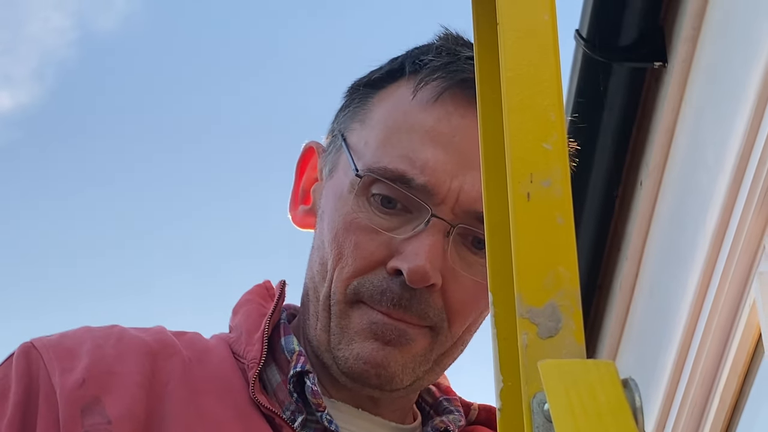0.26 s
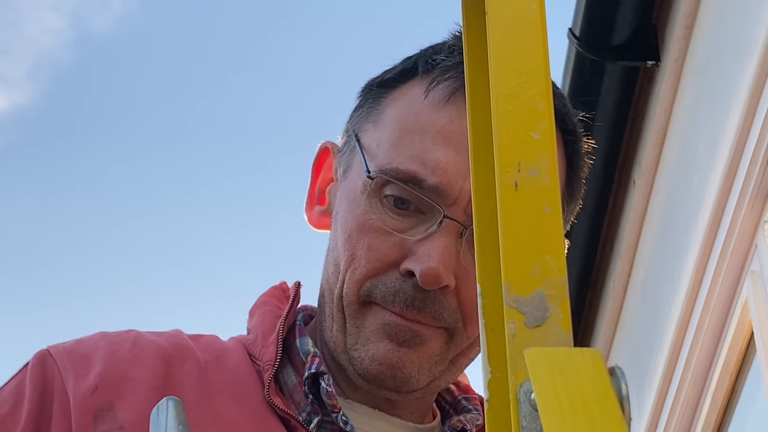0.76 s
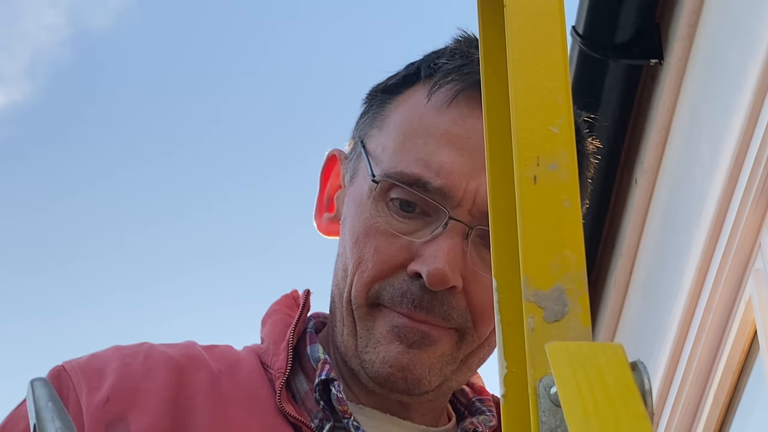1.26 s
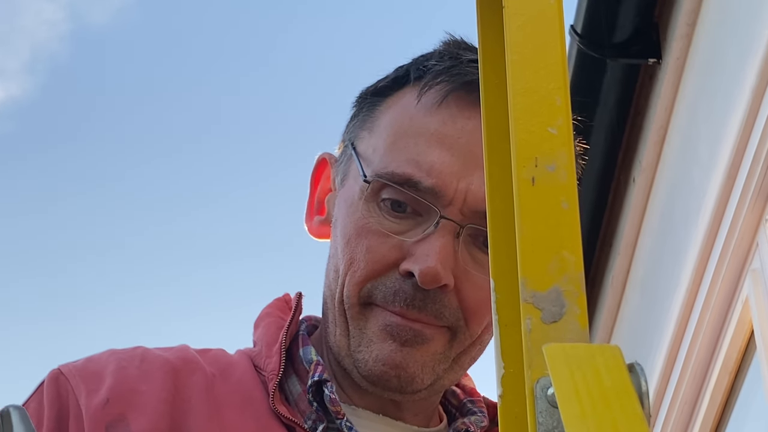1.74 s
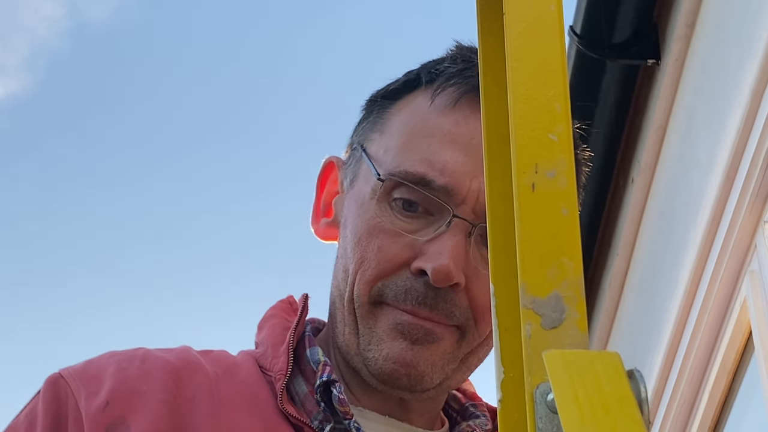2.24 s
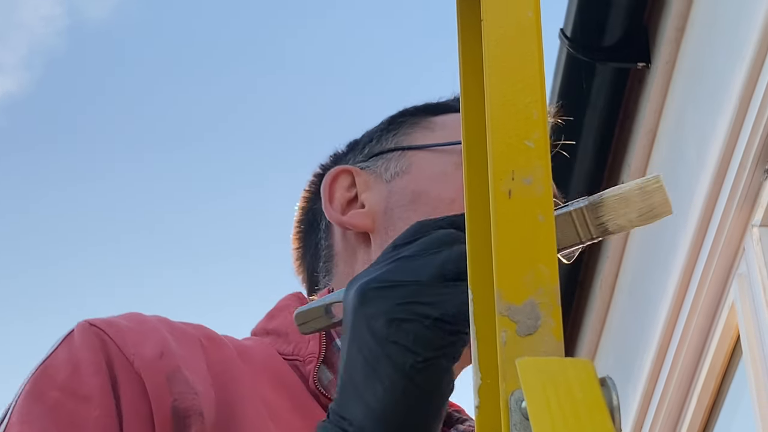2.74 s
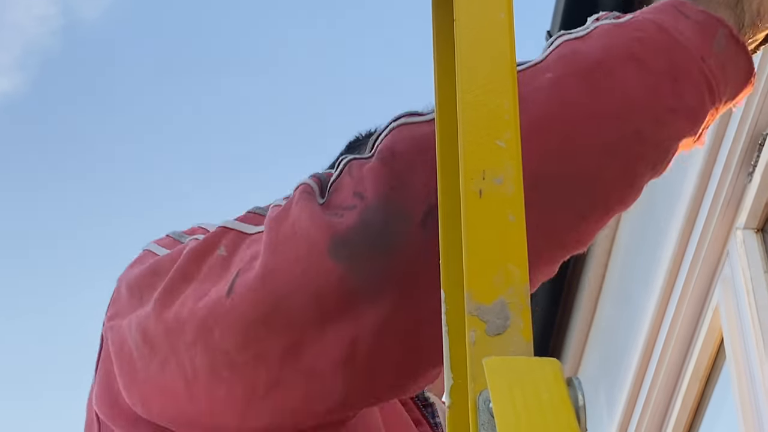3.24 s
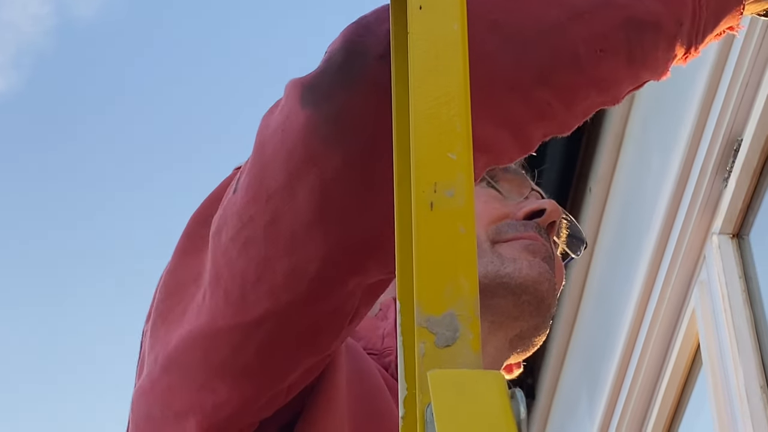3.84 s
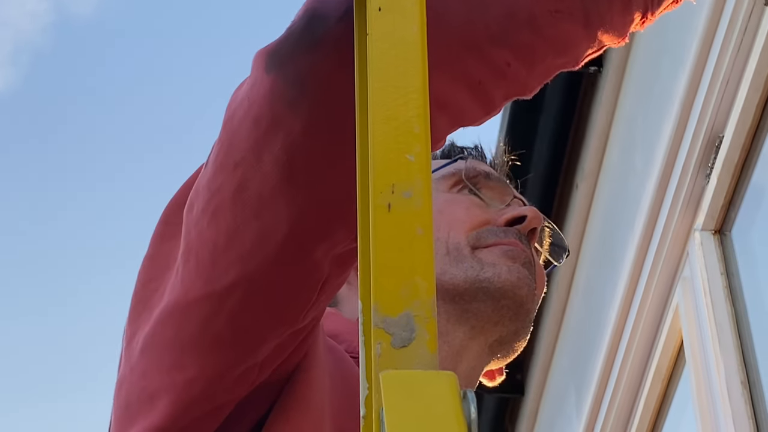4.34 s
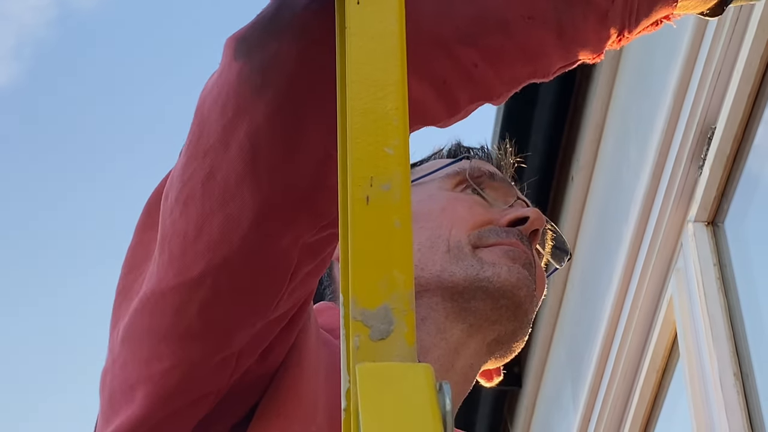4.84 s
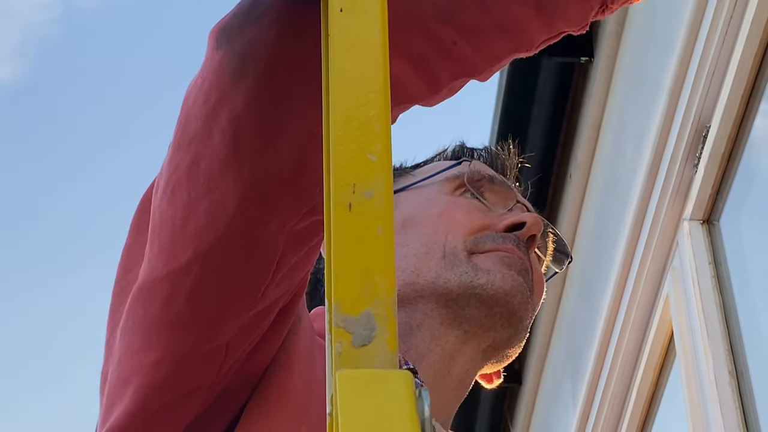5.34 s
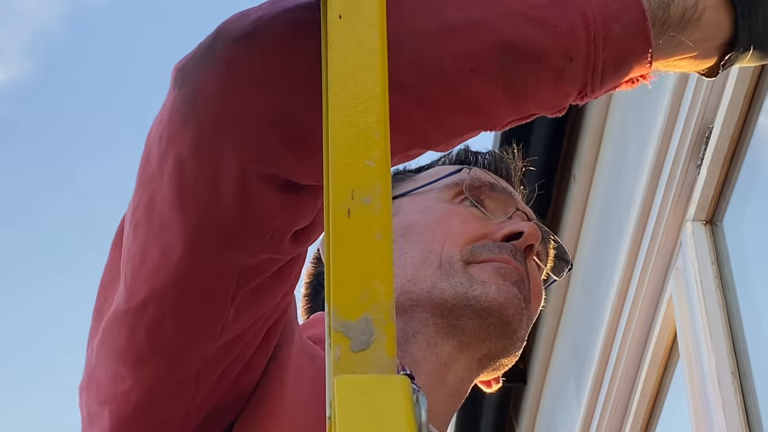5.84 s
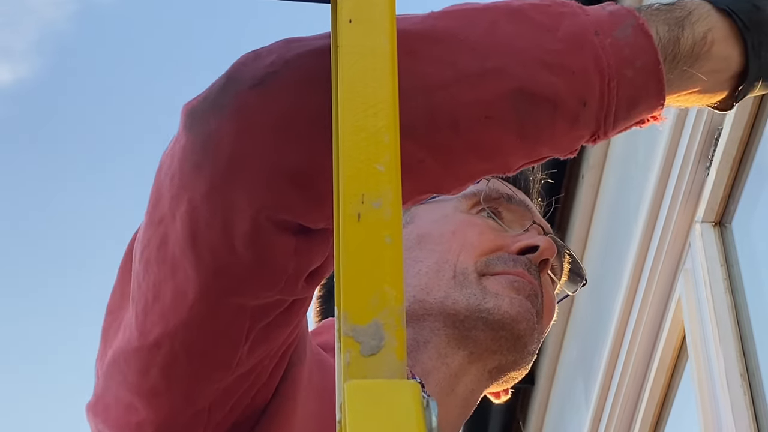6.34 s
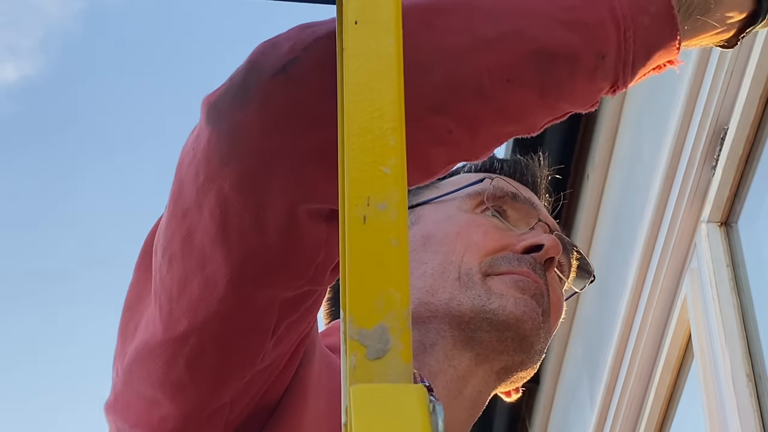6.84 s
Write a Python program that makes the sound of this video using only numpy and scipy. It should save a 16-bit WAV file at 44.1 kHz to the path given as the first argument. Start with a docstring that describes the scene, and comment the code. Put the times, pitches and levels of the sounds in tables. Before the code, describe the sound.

Shore birds chatter some way off above a low outdoor rumble, while a nearer songbird whistles and a paintbrush softly sweeps wood.

```python
"""Painting a window frame, shore birds beyond.

Some way off among echoing roofs a flock of shore birds pipes without pause, each note coloured by
the throat. Nearer by, one songbird whistles and another ticks. Close to the microphone a paint brush
sweeps the frame in tiny slips and bumps it once. Under it all lie town rumble and light wind."""
import sys
import numpy as np
from scipy import signal
from scipy.fft import rfft, irfft, next_fast_len
from scipy.io import wavfile
from scipy.ndimage import map_coordinates

SR = 44100
rng = np.random.default_rng(int(sys.argv[2]) if len(sys.argv) > 2 else 0)


def to_wav(s):
    """Save 16-bit WAV."""
    ch = np.atleast_2d(s).T  # columns
    pcm = np.round(np.clip(ch, -1, 1) * 32767)  # PCM
    wavfile.write(sys.argv[1], SR, pcm.astype(np.int16))


N = 312661

# The distant background. Each row: time in seconds, rumble level in dB, far flock level in dB.
BACKGROUND_LEVELS = [(0, -45.5, -55), (.45, -49.5, -57.5), (1.3, -49, -55.5), (2, -49, -56.5),
                     (3, -46.5, -52), (4, -47.5, -59), (4.8, -53.5, -58), (5.6, -52, -64.5),
                     (6.6, -53, -60), (7.09, -51.5, -61.5)]
# Spectra of town, wind, brush and bird tick. Each row: frequency in Hz, relative density in dB.
RUMBLE_SPECTRUM = [(16, -38), (28, -8.5), (48, 0), (65, -0.5), (122, -6.5), (152, -16), (203, -21),
                   (382, -24), (750, -31), (980, -63.5), (1650, -120)]
WIND_SPECTRUM = [(500, -5.5), (900, 1.5), (1700, -2), (4000, -17.5), (6000, -38), (9000, -33), (15000, -44)]
BRISTLE_SPECTRUM = [(1500, -30), (3500, -11.5), (5500, -5), (7500, -3.5), (9000, -2.5), (11000, -8),
                    (13000, -12.5), (15800, -7)]
TICK_SPECTRUM = [(4300, -40), (5300, -7), (6500, 0.5), (7600, -7.5), (8400, -40)]
# Resonances of a shore bird's throat. Each row: frequency in Hz, gain in dB.
THROAT_GAIN = [(900, 14.5), (1250, 18.5), (1700, 1.5), (2200, 4.5), (2800, 7), (3400, 3), (4000, -10),
               (4600, -12), (5100, -17.5), (8000, -31.5)]
# Piped notes from the near side of the flock. Each row: start and length in seconds,
# first and last pitch in Hz, levels of the first and second partial in dB.
PIPED_NOTES = [(.008, 0.08, 1462, 1364, -63, -60.5), (0.092, 0.058, 1350, 1264, -55.5, -63),
               (.135, 0.14, 1260, 1300, -45.5, -54), (.177, 0.087, 1174, 1090, -43, -54.5),
               (.261, .14, 1300, 1120, -50.5, -52.5), (.268, 0.13, 1524, 1396, -62, -55),
               (.284, 0.058, 1020, 908, -54, -68), (.305, 0.11, 1550, 1416, -55, -52),
               (.33, 0.122, 1441, 1408, -62.5, -57), (.416, 0.057, 1372, 1280, -55, -60),
               (.443, 0.12, 1436, 1342, -53, -59), (.505, 0.046, 1363, 1219, -44.5, -72),
               (.545, 0.021, 1142, 1107, -45.5, -61.5), (.628, 0.043, 1242, 1332, -50, -59.5),
               (.645, 0.099, 1529, 1614, -50.5, -53.5), (.673, .14, 1173, 1067, -48, -64.5),
               (.718, .14, 1330, 1183, -51.5, -55), (.752, .12, 1503, 1393, -47, -50.5),
               (.834, 0.037, 1388, 1277, -42, -51.5), (.865, 0.033, 1185, 1054, -44, -53.5),
               (1.033, 0.058, 1545, 1380, -54, -56), (1.128, 0.073, 1193, 1117, -45, -51),
               (1.203, .17, 1144, 1079, -48.5, -66), (1.277, .12, 1480, 1230, -56, -59.5),
               (1.396, 0.072, 1230, 1113, -48, -52), (1.483, 0.04, 1133, 1070, -55, -63.5),
               (1.516, .12, 1506, 1270, -68, -68), (1.618, 0.031, 1217, 1320, -54, -78),
               (1.666, 0.07, 1226, 1084, -48.5, -54.5), (1.687, 0.026, 1450, 1360, -48, -54),
               (1.732, 0.066, 1485, 1280, -51.5, -51), (1.77, .13, 1546, 1290, -56, -63),
               (1.797, 0.047, 1144, 1076, -48.5, -60.5), (1.8, 0.15, 1580, 1650, -62.5, -72),
               (1.95, 0.071, 1201, 1052, -48.5, -53), (2.074, 0.051, 1573, 1394, -47, -52.5),
               (2.197, 0.035, 1224, 1223, -51.5, -68), (2.219, .054, 1378, 1246, -55, -58),
               (2.249, 0.058, 1175, 1042, -54, -57.5), (2.31, 0.168, 1100, 1107, -76, -70.5),
               (2.358, 0.055, 1557, 1282, -53, -56.5), (2.419, 0.042, 1185, 1030, -48, -63),
               (2.464, 0.019, 1167, 1106, -53, -62), (2.545, 0.079, 1170, 1042, -50, -57),
               (2.564, 0.038, 1237, 1196, -53, -57), (2.644, 0.06, 1380, 1484, -56, -53.5),
               (2.648, 0.061, 1286, 1357, -54, -63), (2.699, .03, 1413, 1324, -47, -53.5),
               (2.713, 0.053, 1535, 1650, -43, -66), (2.744, .029, 1154, 1020, -49.5, -65),
               (2.853, 0.07, 1183, 1027, -47, -56.5), (2.876, 0.025, 1273, 1250, -54, -55),
               (2.906, 0.032, 1470, 1313, -53, -54), (2.957, 0.028, 1215, 1250, -61, -60),
               (3.014, 0.052, 1522, 1306, -54, -50), (3.057, 0.042, 1130, 976, -50, -63),
               (3.13, 0.097, 1230, 1049, -49, -58.5), (3.189, 0.029, 1442, 1263, -46.5, -55),
               (3.216, .041, 1237, 1285, -60, -63), (3.3, 0.094, 1483, 1272, -50, -58),
               (3.448, .082, 1241, 1046, -47, -57.5), (3.512, 0.12, 1267, 1143, -57, -66),
               (3.549, 0.059, 1487, 1380, -56, -54), (3.706, 0.055, 1485, 1300, -51, -57.5),
               (3.747, 0.07, 1430, 1260, -45.5, -56.5), (3.764, 0.058, 1017, 1117, -52, -67),
               (3.82, 0.12, 1179, 1050, -49, -59.5), (3.877, 0.032, 1125, 963, -57, -61),
               (3.968, 0.073, 1496, 1425, -68, -56), (4.052, 0.042, 1523, 1416, -57, -52.5),
               (4.094, 0.045, 1367, 1250, -40.5, -53.5), (4.139, 0.04, 1148, 1044, -52, -56.5),
               (4.266, 0.19, 1184, 1098, -45, -57), (4.455, 0.031, 1395, 1277, -41, -58),
               (4.485, 0.097, 1119, 1085, -59, -59), (4.633, 0.061, 1555, 1400, -51, -63),
               (4.644, 0.155, 1202, 1140, -52, -67), (4.693, 0.036, 1165, 1036, -48, -59.5),
               (4.74, 0.04, 1410, 1335, -52, -58), (4.75, .18, 1200, 1126, -52.5, -58.5),
               (4.887, 0.076, 1400, 1252, -45.5, -58.5), (4.954, 0.075, 1126, 975, -52.5, -61),
               (4.969, 0.052, 1502, 1490, -55, -57.5), (4.986, 0.082, 1202, 1090, -48, -66.5),
               (5.1, 0.052, 1470, 1328, -52.5, -56.5), (5.194, 0.12, 1212, 1188, -56.5, -58.5),
               (5.32, 0.061, 1153, 1010, -60, -62), (5.56, 0.06, 1153, 996, -50.5, -62.5),
               (5.581, 0.066, 1283, 1220, -46, -65), (5.602, 0.062, 1502, 1326, -57, -60),
               (6.145, 0.12, 1096, 980, -53, -62), (6.214, 0.042, 1572, 1585, -58, -55),
               (6.262, 0.029, 1348, 1472, -46, -52.5), (6.266, 0.12, 1210, 1110, -50, -63),
               (6.281, 0.077, 1465, 1570, -59, -61.5), (6.396, 0.085, 1326, 1291, -49.5, -85),
               (6.483, 0.046, 1484, 1246, -48, -48), (6.537, 0.095, 1615, 1275, -56.5, -62),
               (6.545, 0.15, 1312, 1285, -52, -76), (6.558, 0.11, 1112, 1038, -60.5, -63.5),
               (6.642, 0.03, 1450, 1340, -53, -66), (6.651, 0.064, 1277, 1296, -43.5, -74),
               (6.749, .06, 1385, 1236, -44, -52), (6.81, 0.019, 1158, 1042, -52, -56),
               (6.931, 0.036, 1427, 1310, -52, -78), (7.052, 0.055, 1496, 1494, -52.5, -56)]
# Cries that arch or sink. Each row: start and length in seconds,
# first, middle and last pitch in Hz, levels of the first and second partial in dB.
ARCHED_CRIES = [(1.075, 0.098, 1403, 1423, 1265, -50, -51.5), (1.376, .12, 1400, 1426, 1300, -54, -52),
                (2.017, .11, 1390, 1434, 1300, -55.5, -56), (2.33, 0.086, 1400, 1466, 1354, -63, -57.5),
                (2.97, .09, 1350, 1480, 1410, -65, -71), (3.814, 0.064, 1390, 1440, 1329, -52, -56.5),
                (4.038, 0.037, 1136, 1200, 1190, -50.5, -61), (4.308, 0.15, 1576, 1415, 1343, -54, -56.5),
                (5.417, 0.25, 2010, 1843, 1728, -58.5, -77), (5.428, .066, 1364, 1424, 1504, -68, -56.5),
                (5.497, 0.06, 1452, 1430, 1300, -46.5, -51.5), (5.66, 0.15, 1320, 1253, 1193, -58, -68.5),
                (5.89, .09, 1545, 1456, 1333, -52, -53.5), (5.981, 0.11, 1556, 1380, 1246, -47.5, -53.5),
                (6.829, 0.079, 1472, 1580, 1330, -67, -55), (7.017, 0.071, 1460, 1466, 1250, -46.5, -50)]
# The songbird nearer by. Each row: start and length in seconds, dip and top pitch in Hz, level in dB.
SONG_WHISTLES = [(.03, 0.2, 4876, 5210, -51), (2.598, 0.14, 5020, 5240, -48.5),
                 (2.948, 0.21, 4920, 5255, -56.5), (4.176, .17, 5270, 5310, -50.5),
                 (6.22, 0.18, 5073, 5416, -48.5), (6.674, .17, 5080, 5300, -61)]
# Thin high bird tones. Each row: start and length in seconds, pitch and warble depth in Hz, level in dB.
HIGH_TONES = [(0.086, 0.17, 7080, 418, -70.5), (1.616, 0.14, 5360, 37, -63.5), (1.875, 0.018, 7100, 2, -78),
              (3.264, 0.21, 4660, 5, -71.5), (6.327, .18, 4570, 13, -63.5),
              (2.977, 0.032, 7400, 148, -63.5), (5.676, 0.044, 7300, 150, -66.5)]
# The brush, close to the microphone. Each row: start and length in seconds, level in dB.
BRUSH_STROKES = [(.768, 0.071, -78), (.855, .055, -70.5), (1.08, .14, -74.5), (1.293, 0.083, -77),
                 (1.514, 0.095, -71), (1.997, 0.18, -71.5), (2.348, 0.26, -76), (2.593, .095, -66.5),
                 (2.68, 0.42, -75), (3.118, .27, -74.5), (3.574, 0.11, -62.5), (3.856, 0.12, -62),
                 (4.111, .15, -64.5), (4.385, .145, -66.5), (4.679, .13, -66), (5.012, .16, -62.5),
                 (5.269, 0.13, -60.5), (5.509, 0.13, -51.5), (5.857, 0.11, -58), (6.138, 0.13, -60),
                 (6.453, 0.13, -57), (6.65, 0.19, -63.5), (6.984, 0.2, -56)]
# Bristles snapping off an edge. Each row: start in seconds, level in dB.
BRISTLE_FLICKS = [(.8804, -72), (1.089, -51), (3.8322, -68), (4.2917, -53), (5.8277, -76), (5.8755, -53),
                  (6.1439, -57)]
# A nearby bird's alarm. Each row: start in seconds, level in dB.
ALARM_TICKS = [(0.96, -70), (2.1794, -69), (3.267, -71), (3.521, -70.5), (6.4055, -70.5), (6.5894, -72.5)]
# Echo among the roofs. Each row: frequency in Hz, time to fall 60 dB in seconds.
ROOF_DECAY = [(1000, 0.44), (3000, 0.28), (5200, 0.36), (8000, 0.2)]
# How alike left and right are. Each row: frequency in Hz, likeness from 0 (wide) to 1 (centred).
STEREO_LIKENESS = [(60, 0.99), (150, 0.92), (350, 0.76), (700, 0.023), (1400, 0.34), (1900, 0.79),
                   (2200, 0.87), (4000, 1), (7200, 1), (8000, 1), (15000, 1)]
# Phase between left and right. Each row: frequency in Hz, lead of the left in radians.
STEREO_PHASE = [(600, 0), (1050, -2.3), (1400, -3), (1750, -3.8), (2050, -6.1), (4200, -6.28),
                (7300, -6.28), (8950, -9.42), (10900, -12.56), (11500, -12.6), (13250, -15.7),
                (15300, -18.85)]
# Balance between left and right. Each row: frequency in Hz, left over right in dB.
STEREO_BALANCE = [(150, .5), (380, 4), (700, 1), (1290, -4), (2100, 0)]


def amp(db):
    return 10 ** (np.asarray(db) / 20)


def unit_rms(x):
    return x / np.sqrt(np.mean(x ** 2) + 1e-20)


def along(points, hz):
    """Reads (Hz, value) points on a log frequency axis."""
    freqs, values = np.transpose(points)
    return np.interp(np.log(hz + 1), np.log(freqs + 1), values)


def curves(rows):
    """One value per sample for each column after the time."""
    times, *columns = np.transpose(rows)
    return [np.interp(np.arange(N) / SR, times, column) for column in columns]


def wobble(rate, size=N):
    """A smooth random curve, rate knots a second."""
    knots = rng.standard_normal(int(size * rate / SR) + 4)
    return map_coordinates(knots, [np.arange(size) * rate / SR])


def filtered(x, response):
    """Filters x by a complex response of frequency."""
    size = next_fast_len(N + SR // 2)
    return irfft(rfft(x, size) * response(np.fft.rfftfreq(size, 1 / SR)), size)[..., :N]


def add(track, start, sound):
    """Mixes a sound into a track at start seconds."""
    part = track[max(round(start * SR), 0):][:len(sound)]
    part += sound[:len(part)]


def spread(pair):
    """Two unrelated signals become left and right: wide in the low mids, centred in bass and treble."""
    angle = lambda hz: np.arccos(np.clip(along(STEREO_LIKENESS, hz), -1, 1)) / 2
    mid, side = filtered(pair, lambda hz: np.array([np.cos(angle(hz)), np.sin(angle(hz))]))
    return np.array([mid + side, mid - side])


def stereo_noise(spectrum):
    """Noise of the given spectrum, spread over left and right, at rms 1."""
    pair = filtered(rng.standard_normal((2, N)), lambda hz: amp(along(spectrum, hz)))
    return unit_rms(spread(pair))


def town(rumble_db, swell_below_hz=149, steady_db=-50):
    """The town all around: a deep rumble that swells, and a steady hum above it."""
    hum = stereo_noise(RUMBLE_SPECTRUM)
    deep = filtered(hum, lambda hz: 1 / (1 + (hz / swell_below_hz) ** 6))
    return amp(rumble_db + 2.7 * wobble(5.087)) * deep + amp(steady_db) * (hum - deep)


def wind(level_db=-62):
    """Light wind, an even rush with little bass."""
    return amp(level_db) * stereo_noise([(250, -30)] + WIND_SPECTRUM)


def partial_levels(hz, first_db, second_db):
    """Six partials in dB: the third and fourth follow the second through the throat; two more trail."""
    second_gain, third_gain, fourth_gain = along(THROAT_GAIN, hz * np.arange(2, 5))
    third_db = second_db + third_gain - second_gain + 1.5
    fourth_db = second_db + fourth_gain - second_gain + 7.5
    return [first_db, second_db, third_db, fourth_db, fourth_db - 3, fourth_db - 20]


def piped_note(length, pitches_hz, levels_db, edge_s=.014):
    """Partials on a bent pitch swell as they cross throat resonances and flutter in the moving air."""
    t = np.arange(round((length + edge_s) * SR)) / SR
    arch = np.polyfit([0, .5, 1], pitches_hz, deg=2)
    hz = np.polyval(arch, (t - edge_s / 2) / length)
    phase = 2 * np.pi * np.cumsum(hz * (1 + .0051 * wobble(68.3, len(t)))) / SR
    sound = np.zeros(len(t))
    for k, db in enumerate(levels_db, start=1):
        throat_db = along(THROAT_GAIN, k * hz)
        flutter_db = 2 * wobble(45, len(t))
        sound += amp(db + throat_db - throat_db.mean() + flutter_db) * np.sin(k * phase + k)
    envelope = np.clip(np.minimum(t, t[::-1]) / edge_s, 0, 1) ** 2
    return envelope * np.sqrt(2) * sound


def far_flock(count=250):
    """Many birds in the distance: short random falling notes on two unrelated tracks."""
    pair = np.zeros((2, N))
    for k, (when, long, high, fall, loud, dull) in enumerate(rng.random((count, 6))):
        hz = 1130 + 450 * high
        pitches_hz = [hz, hz * (1 - .05 * fall), hz * (1 - .14 * fall)]
        levels_db = partial_levels(hz, first_db=10 * loud, second_db=10 * loud - 4.5 - dull)
        add(pair[k % 2], when * N / SR, piped_note(.02 + .04 * long, pitches_hz, levels_db))
    return unit_rms(pair)


def near_flock(early_s=.005):
    """The nearer shore birds: each call's bearing tilts its low partial to the left or right."""
    calls = list(ARCHED_CRIES)
    for start, length, first_hz, last_hz, *levels_db in PIPED_NOTES:
        glide_share = np.clip(.62 - 4 * length, 0, 1)  # done by mid-note: longer notes hold, then bend
        middle_hz = first_hz + (last_hz - first_hz) * glide_share
        calls.append((start, length, first_hz, middle_hz, last_hz, *levels_db))
    bearings = rng.uniform(-1.12, 1, len(calls))
    mid, side = np.zeros((2, N))
    for (start, length, *pitches_hz, first_db, second_db), bearing in zip(calls, bearings):
        sound = piped_note(length, pitches_hz, partial_levels(pitches_hz[1], first_db, second_db))
        add(mid, start - early_s, sound)
        add(side, start - early_s, bearing * sound)
    side = filtered(side, lambda hz: .69 / (1 + (hz / 1800) ** 8))
    return np.array([mid + side, mid - side])


def roof_echo(x):
    """Echoes from walls and roofs; each frequency dies at its own speed."""
    hz, t, spectra = signal.stft(rng.standard_normal((2, SR // 2)), SR, nperseg=256)
    decay = amp(-60 * t / along(ROOF_DECAY, hz)[:, None])
    _, tail = signal.istft(spectra * decay, SR, nperseg=256)
    tail /= np.linalg.norm(tail[0])
    return spread(signal.fftconvolve(x[None], tail, axes=1)[:, :N])


def whistles(start_hz=5700, scoop_s=.013):
    """A songbird nearer by: each pure whistle drops fast into a dip, then climbs to its top."""
    attack, climb_at, climb_width, release_at = .09, .44, .05, .62  # shares of the length
    track = np.zeros(N)
    for start, length, dip_hz, top_hz, db in SONG_WHISTLES:
        t = np.arange(round(length * SR)) / SR
        progress = t / length
        climb = (progress - climb_at) / climb_width
        hz = dip_hz + (start_hz - dip_hz) * np.exp(-(t / scoop_s) ** 1.5)
        hz += (top_hz - dip_hz) / (1 + np.exp(-climb))
        hz += 35 * wobble(130, len(t))  # a slight ripple in pitch
        fade_db = 25.5 * np.clip((progress - release_at) / (1 - release_at), 0, 1) ** 3.4
        fade_db += 4 * np.exp(-(climb / 2 + 1) ** 2)  # the voice weakens just before the climb
        flutter_db = 3 * wobble(110, len(t))
        envelope = np.clip(progress / attack, .15, 1) * amp(db - fade_db + flutter_db)
        add(track, start, envelope * np.sin(2 * np.pi * np.cumsum(hz) / SR))
    return track


def high_tones(warble_rate_hz=21):
    """Thin high bird tones that swell and fade: songbird pips and held shore-bird overtones."""
    track = np.zeros(N)
    for start, length, pitch_hz, depth_hz, db in HIGH_TONES:
        t = np.arange(round(length * SR)) / SR
        hz = pitch_hz + depth_hz * np.sin(2 * np.pi * warble_rate_hz * (t - .024))
        envelope = amp(db) * np.sin(np.pi * t / length)
        add(track, start, envelope * np.sin(2 * np.pi * np.cumsum(hz) / SR))
    return track


def brush(hardest_share=.57):
    """Close to the microphone, bristles slip over the frame in thousands of tiny uneven jerks."""
    t, pressure = np.arange(N) / SR, np.zeros(N)
    for start, length, db in BRUSH_STROKES:
        hardest, end = start + hardest_share * length, start + length
        off_peak = np.abs(t - hardest) / np.where(t < hardest, hardest - start, end - hardest)
        pressure += amp(db - 9.7 * np.minimum(off_peak, 4) ** 1.8)  # the stroke lands and lifts quickly
    grit = amp(1.2 * wobble(900) + 1.6 * wobble(40))
    return pressure * unit_rms(grit) * stereo_noise(BRISTLE_SPECTRUM)


def bristle_flicks(t60_s=.0062):
    """Now and then a bristle snaps free of an edge with a tiny bright click."""
    track, t = np.zeros(N), np.arange(200) / SR
    for start, db in BRISTLE_FLICKS:
        add(track, start, amp(db - 60 * t / t60_s) * rng.standard_normal(len(t)))
    return filtered(track, lambda hz: hz / (hz + 4000))


def alarm_ticks(fast_t60_s=.1, slow_t60_s=.56):
    """A second bird nearby ticks harshly: sudden bursts of high hiss that die away."""
    envelope, t = np.zeros(N), np.arange(SR // 4) / SR
    decay = amp(-60 * t / fast_t60_s) + 1.63 * amp(-60 * t / slow_t60_s)
    for start, db in ALARM_TICKS:
        add(envelope, start - .003, amp(db) * decay)
    hiss = filtered(rng.standard_normal(N), lambda hz: amp(along(TICK_SPECTRUM, hz)))
    return envelope * unit_rms(hiss)


def handle_knock(start_s=5.83, pitch_hz=190, rise_s=.0028, t60_s=.052):
    """The brush handle bumps the frame once, dull wood on wood."""
    track, t = np.zeros(N), np.arange(SR // 20) / SR
    envelope = amp(-42 - 60 * t / t60_s) * (1 - np.exp(-t / rise_s))
    add(track, start_s, envelope * np.sin(2 * np.pi * pitch_hz * t))
    return track


def scene():
    """From the window: the flock among the roofs, songbirds nearer, the brush close, the town around."""
    rumble_db, far_db = curves(BACKGROUND_LEVELS)
    tones, ticks = whistles() + high_tones(), alarm_ticks()
    near, far = near_flock(), amp(far_db) * far_flock()
    flock = near + amp(-8) * roof_echo(near.mean(axis=0))
    flock += spread(far) + amp(-3.5) * roof_echo(far.sum(axis=0))
    # The calls are weak above their fourth partial.
    flock = filtered(flock, lambda hz: 1 - .8 / (1 + (4950 / (hz + 1)) ** 24))
    high_calls = tones + amp(-5) * roof_echo(tones) + ticks
    return flock + high_calls + town(rumble_db) + wind() + brush() + bristle_flicks() + handle_knock()


def record(dry):
    """Left and right differ in phase and level at each frequency; nothing passes above the band limit."""
    top_hz = 15800
    freqs, lead = np.transpose(STEREO_PHASE)
    half = np.array([[.5], [-.5]])  # shared equally between left and right
    phase = lambda hz: np.exp(1j * half * np.interp(hz, freqs, lead))
    gain = lambda hz: amp(half * along(STEREO_BALANCE, hz))
    return filtered(dry, lambda hz: phase(hz) * gain(hz) * (hz < top_hz))


dry = scene()
out = record(dry)
to_wav(out)
```